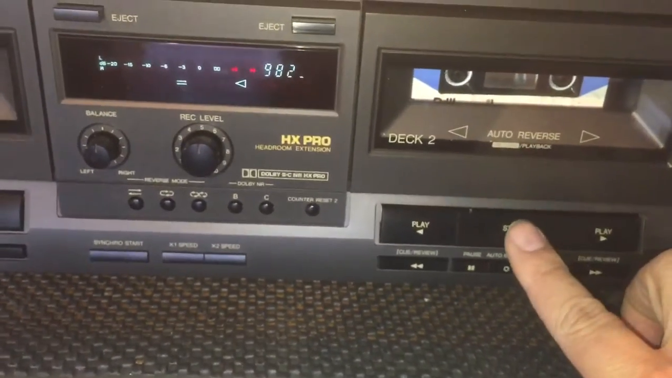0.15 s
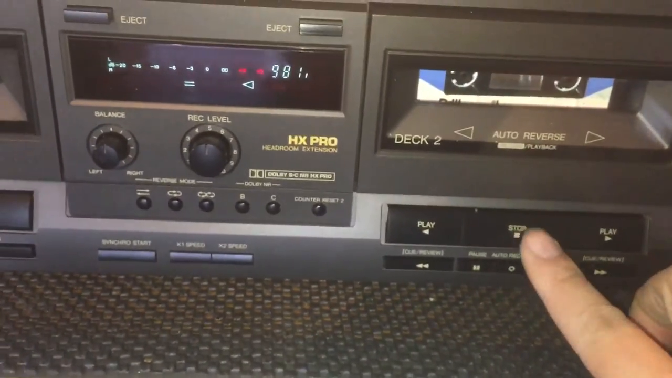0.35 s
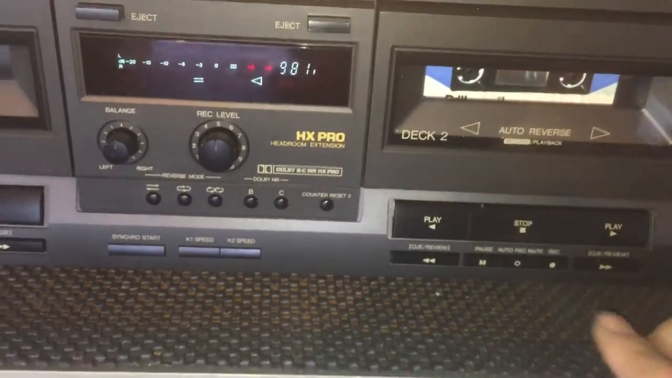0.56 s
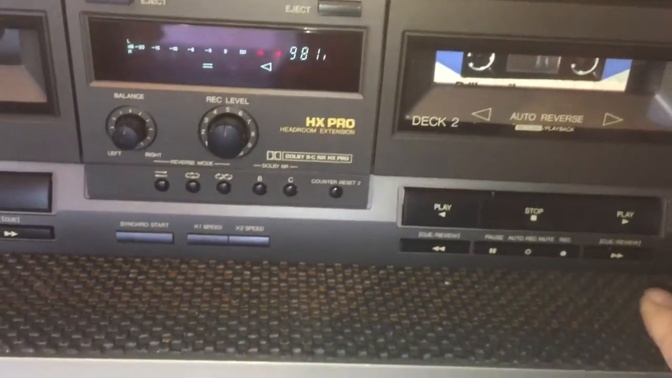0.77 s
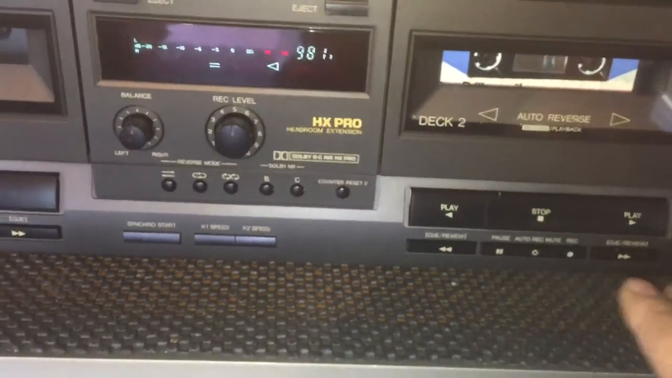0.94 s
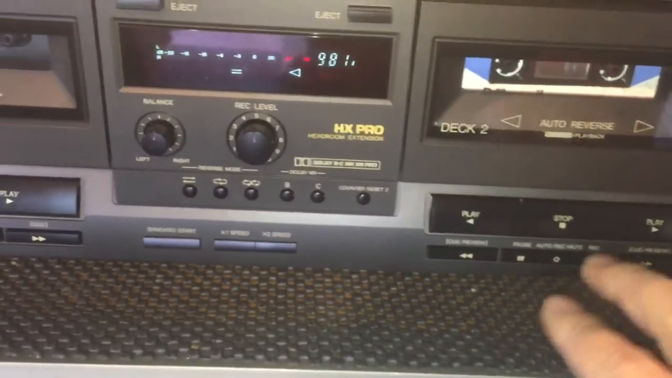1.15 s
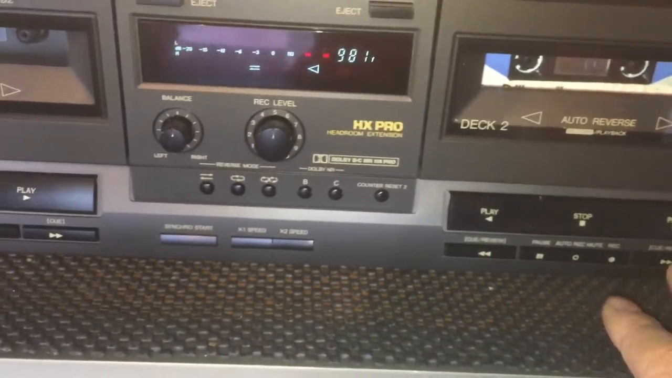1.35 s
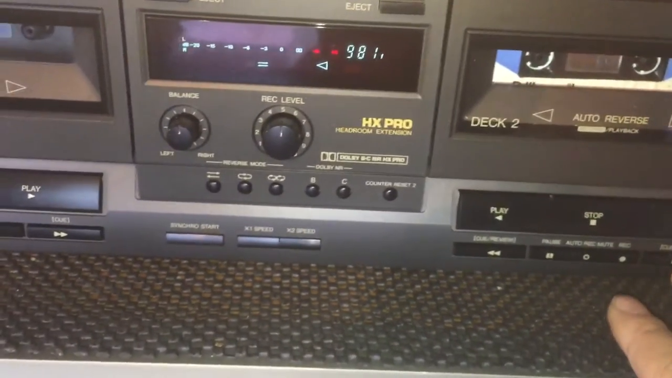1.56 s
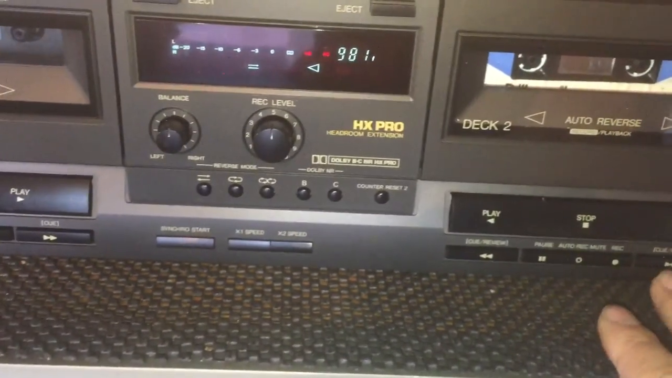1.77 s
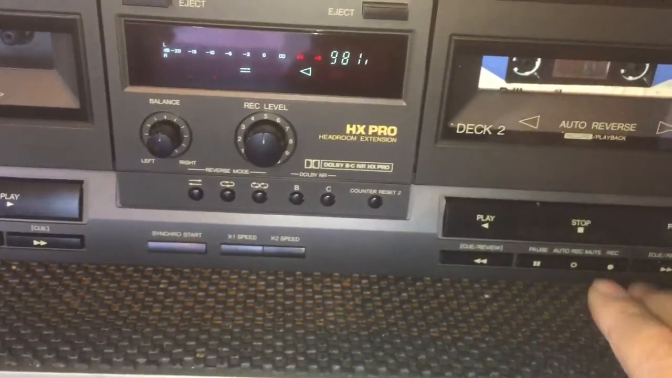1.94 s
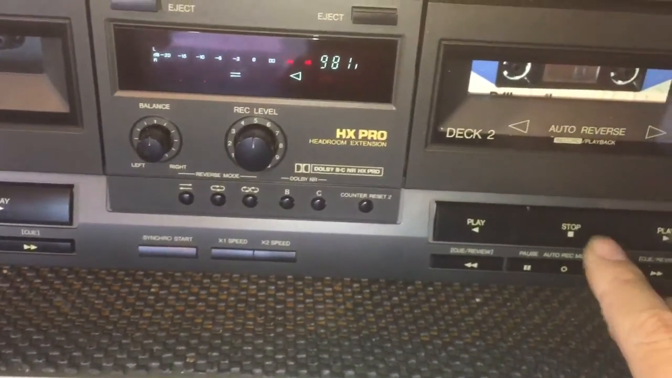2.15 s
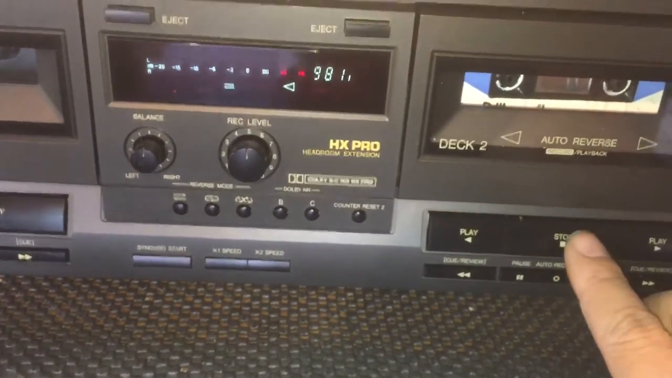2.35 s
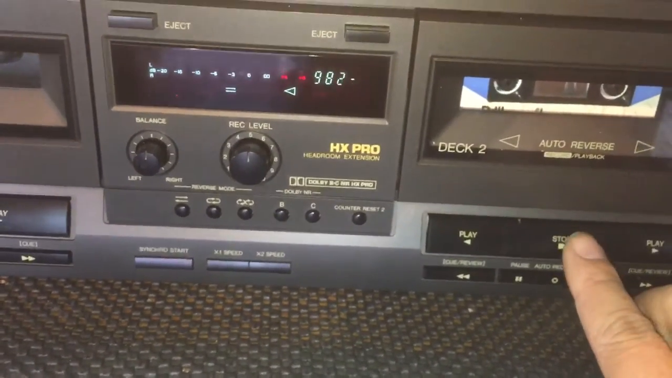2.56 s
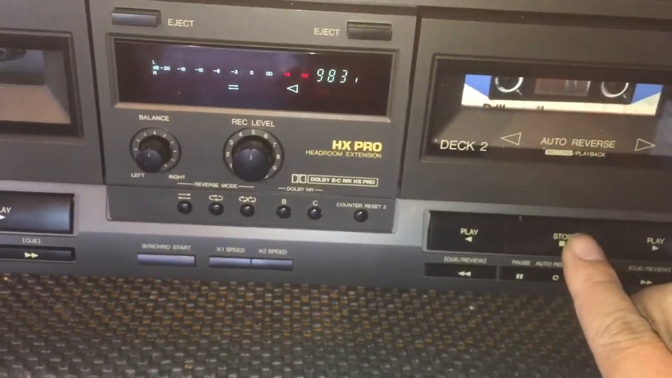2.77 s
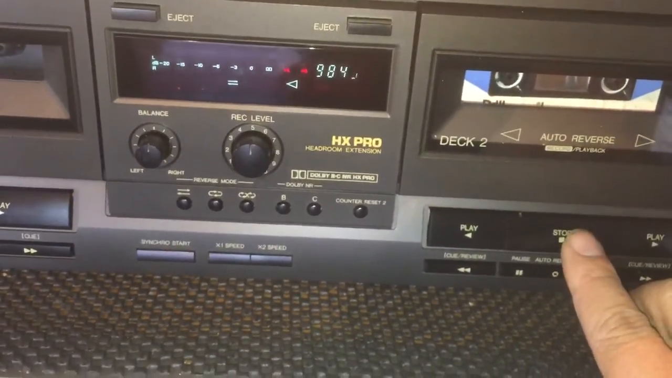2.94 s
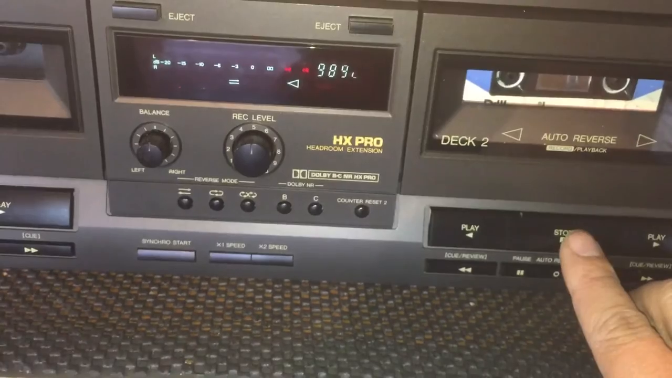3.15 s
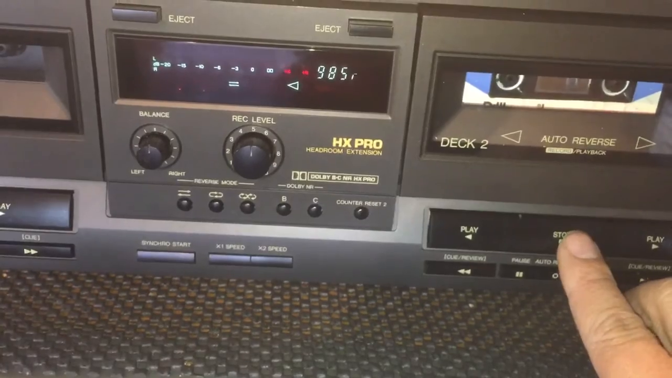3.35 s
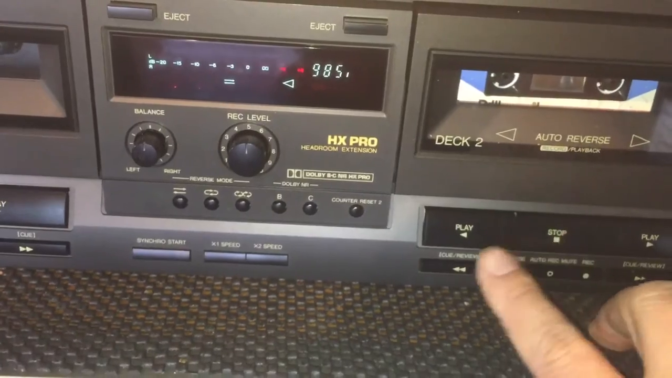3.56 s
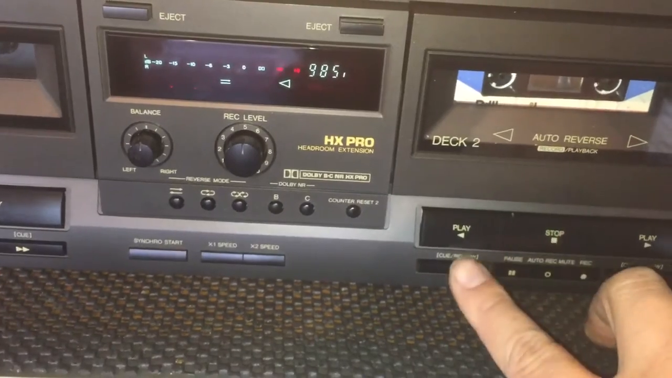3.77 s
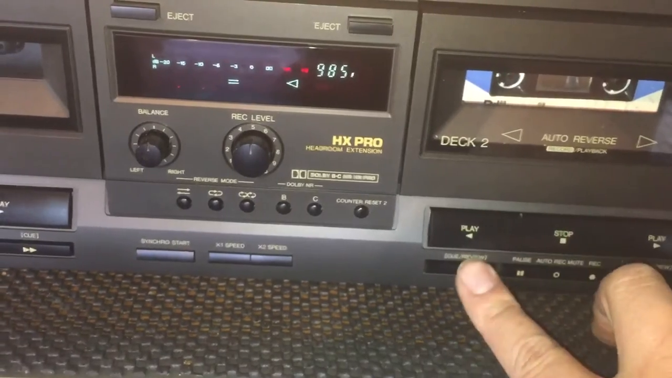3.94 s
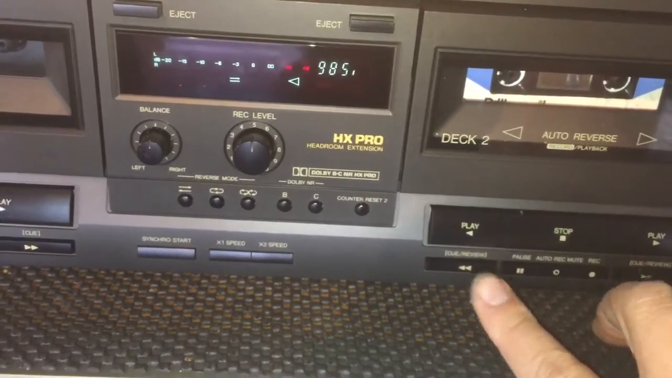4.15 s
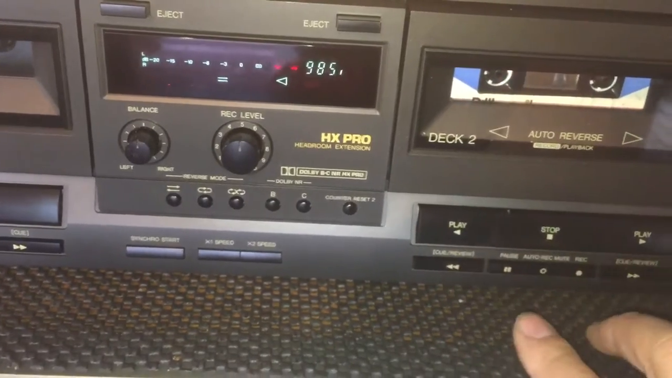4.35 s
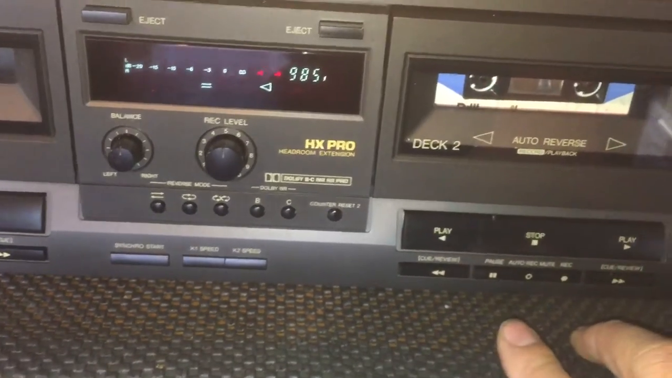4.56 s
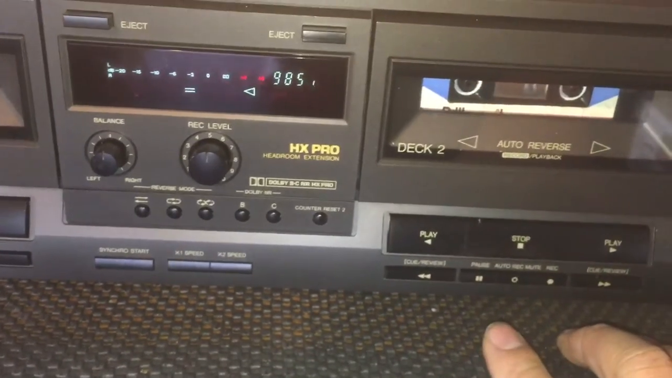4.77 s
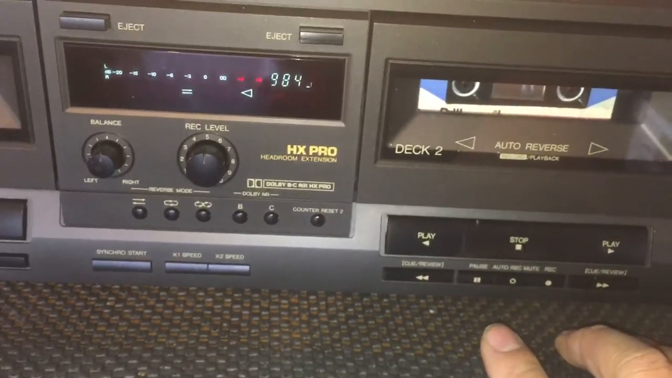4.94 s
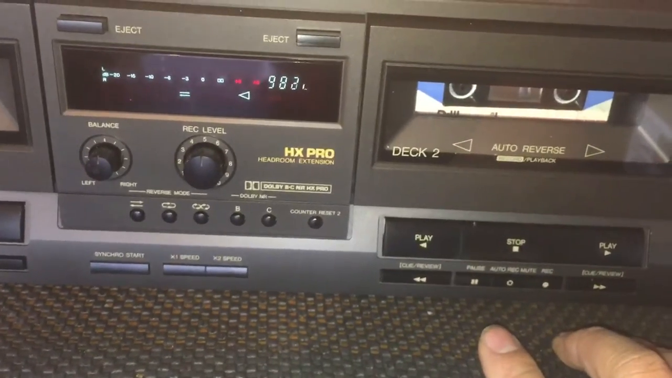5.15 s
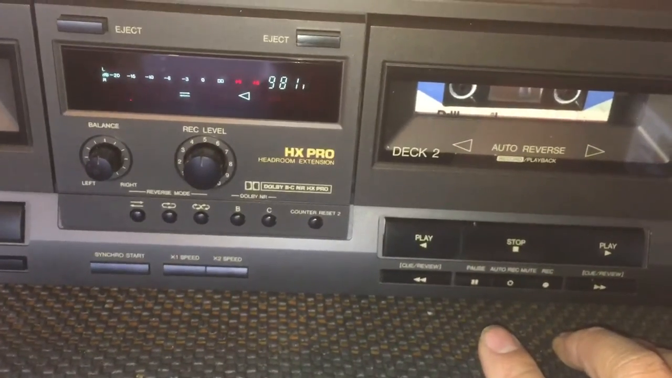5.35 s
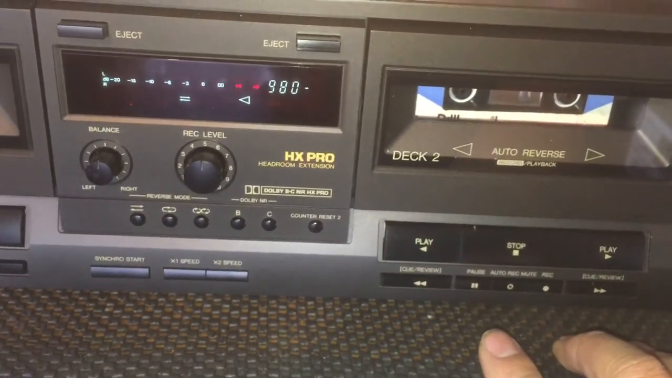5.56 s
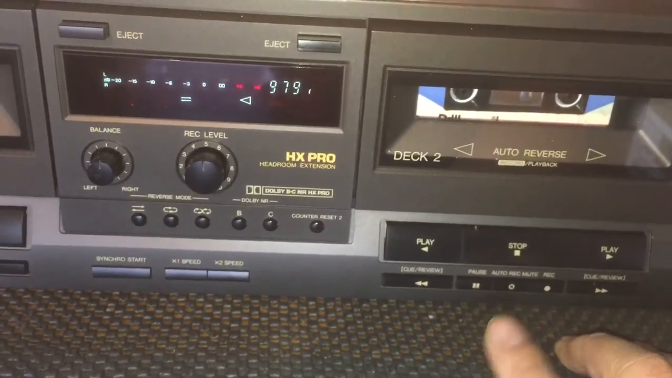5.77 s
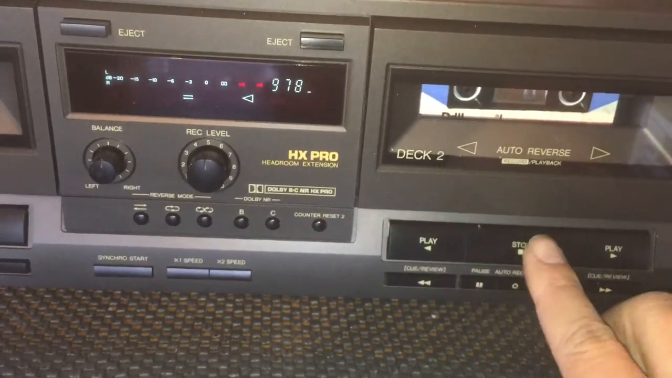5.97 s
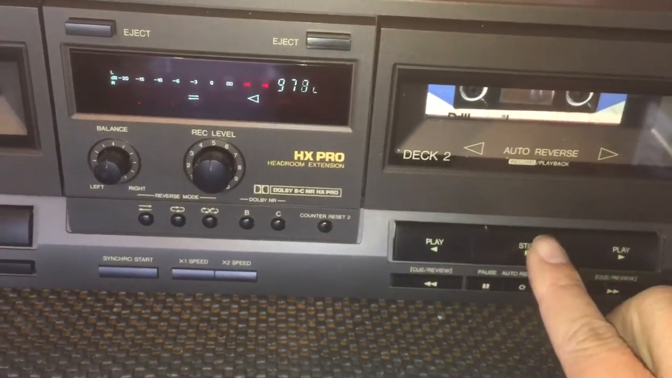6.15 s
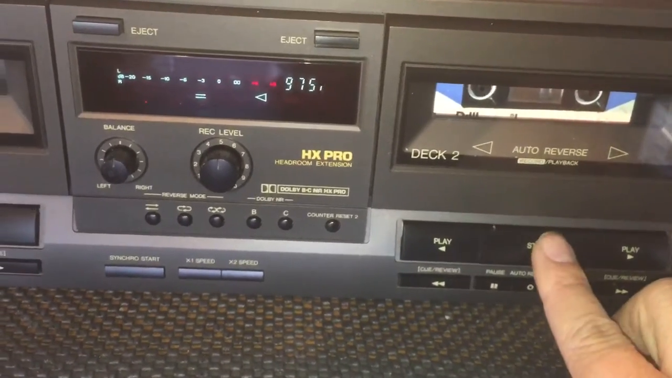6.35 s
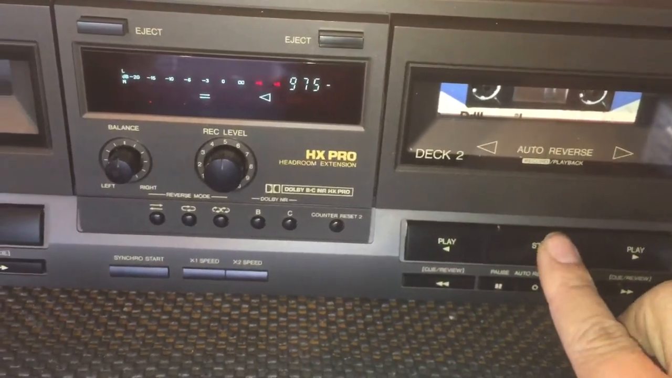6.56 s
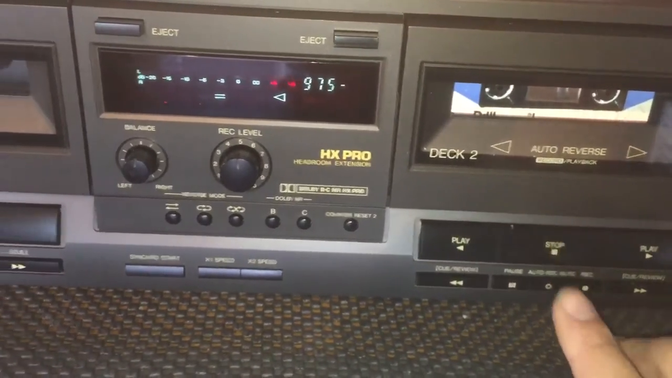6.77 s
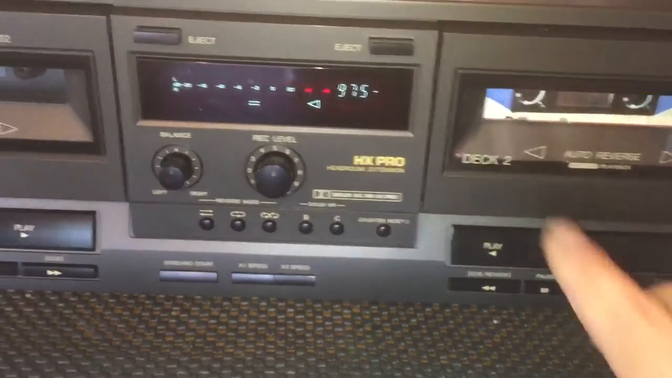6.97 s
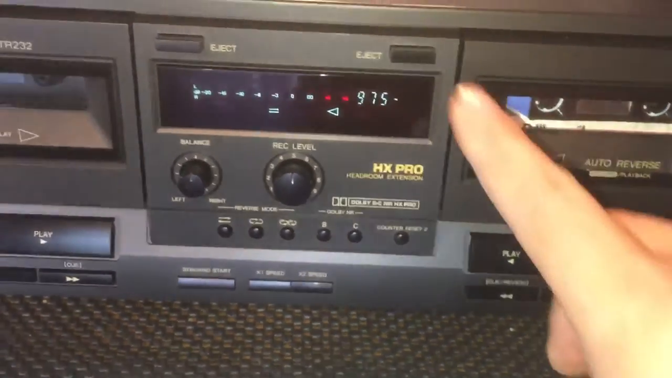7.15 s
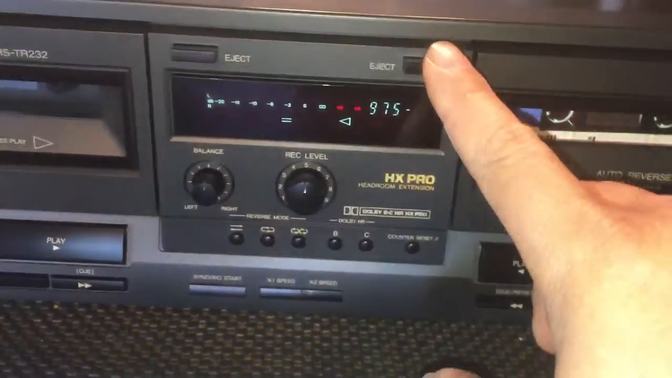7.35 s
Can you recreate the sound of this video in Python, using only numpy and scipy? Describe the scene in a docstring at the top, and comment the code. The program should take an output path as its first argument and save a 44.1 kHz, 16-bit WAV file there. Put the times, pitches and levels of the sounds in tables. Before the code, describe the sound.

Close up in a small room, a cassette deck rewinds for a moment with fast, loud ticking, then a button clicks and the tape stops with a clatter. More clicks and mechanical clacks lead into about a second of soft, whining forward winding. It stops sharply, the mechanism clacks again, and a longer ticking rewind ends in a last clatter, over faint room rumble.

```python
"""First comes a moment of fast, loud ticking over faint room rumble: a cassette deck is rewinding, close up
in a small room, and a gear tooth catches on every turn. A key clicks and the tape stops with a clatter as
the gears drop out and a steel brake snaps home. After more clicks, a cam (a shaped wheel that pushes
levers) swings the heads and gears in with clacks, and the tape winds forward with a soft gear whine.
It stops, the cam turns again, and a longer rewind ends in a last clatter."""
import sys
import numpy as np
from scipy import signal
from scipy.fft import rfft, irfft, next_fast_len
from scipy.io import wavfile
from scipy.ndimage import map_coordinates

SR = 44100
rng = np.random.default_rng(int(sys.argv[2]) if len(sys.argv) > 2 else 0)


def unload_wav(signal):
    """Save mono or channel-first audio to the path in sys.argv[1] as 16-bit WAV at rate SR, clipped to [-1, 1]."""
    wavfile.write(
        sys.argv[1],
        SR,
        np.round(np.clip(np.atleast_2d(signal).T, -1, 1) * 32767).astype(np.int16),
    )


N = 326781
TIME = np.arange(N) / SR
BRIEF = TIME[:SR // 6]  # the time span of one knock

# Tone colours. Each row: frequency in Hz, relative strength there in dB.
AIR_SPECTRUM = [(12, -61), (25, -36), (38, -18), (52, -8.5), (70, -5.5), (97, -10.5), (125, -18),
                (195, -22), (249, -21.5), (476, -27), (796, -31), (887, -26.5), (1070, -29), (1700, -30),
                (8140, -39.5), (16000, -44)]  # room rumble and hiss
TICK_SPECTRUM = [(200, -33.5), (600, -25.5), (900, -12), (1800, -11.5), (2700, -4), (3700, -5), (4850, -8),
                 (5700, -5.5), (7900, -1.5), (9300, 6.5), (10300, 1.5), (11200, 6), (13000, 2.5),
                 (14500, -6), (15800, -2.5)]  # small, sharp ticks
TAPE_SPECTRUM = [(100, -18), (300, -1), (550, -7.5), (1100, 2), (1700, 1.5), (2200, 1), (3000, 1),
                 (4800, -9), (6500, 0.5), (9500, -4.5), (13000, -9), (15800, -10.5)]  # moving tape
KEY_SPECTRUM = [(300, -39.5), (600, -12), (880, -6), (1400, -5), (2250, -3), (3000, -3.5), (3800, -5),
                (5000, -14.5), (8000, -40.5)]  # a plastic key
THUD_SPECTRUM = [(35, -26), (80, -5.5), (120, -18.5), (190, 0), (250, 0.5), (370, -4.5), (520, -8.5),
                 (700, -13.5), (1200, -45)]  # the low part of a blow
CLACK_SPECTRUM = [(300, -36), (580, -4.5), (760, -2), (1300, -4.5), (1900, -1), (3100, 1), (4300, -4.5),
                  (5200, -10), (8000, -39)]  # its middle
SNAP_SPECTRUM = [(2000, -49.5), (4200, -12.5), (4900, -9.5), (5600, 3.5), (7500, -1.5), (8800, -3),
                 (10000, -10.5), (13000, -36)]  # its lower treble
SIZZLE_SPECTRUM = [(5000, -41), (8000, -13), (9200, -2.5), (10400, -3.5), (11700, 0), (13500, -4),
                   (15800, -9)]  # its upper treble
MOTOR_SPECTRUM = [(60, -0.5), (120, 0.5), (200, -9), (340, 1.5), (500, -9.5), (900, -9), (2500, -13),
                  (6000, -22), (15000, -23)]  # the cam's grinding drive
# Pitches that a part boosts or weakens. Each row: centre in Hz, width in Hz, boost in dB (minus is a dip).
GEAR_RESONANCES = [(279.2, 15, 5.5), (504, 140, 5), (620, 75, -10), (980, 42, 5), (1163, 51, 8.5),
                   (1370, 48, 9), (1493, 72, 9.5), (1670, 40, 4), (1790, 81, -8), (2008, 60, 10.5),
                   (2530, 76, -7), (2720, 190, 4), (3110, 320, 3.5), (3556, 190, 12), (4210, 280, 8.5),
                   (5360, 110, 10), (5850, 240, 10.5), (6930, 450, 8), (8200, 400, -1.5), (8960, 340, 4.5),
                   (11800, 210, 1.5), (11250, 280, 2), (13700, 470, 5.5)]
KEY_RESONANCES = [(870, 47, 11), (1205, 110, 7.5), (1470, 46, -4.5), (1710, 160, 2), (2820, 200, 3.5),
                  (4270, 300, 4.5), (5800, 500, 3.5), (7040, 500, 4.5), (8600, 400, 2.5),
                  (10500, 400, -2.5), (13400, 600, 6)]
CHASSIS_RESONANCES = [(270.5, 21, 8.5), (343, 44, 7), (440, 70, -1.5), (628, 58, -9), (742, 91, 6.5),
                      (849.7, 70, 5.5), (1159, 170, 10), (1620, 38, 6), (1670, 48, 9), (2010, 15, 2.5),
                      (2300, 56, 4), (2780, 67, 5.5), (3111, 170, 4), (3240, 120, 3.5), (3500, 160, 2.5),
                      (4400, 210, 2.5), (5900, 170, 3), (7000, 500, 2), (9100, 500, 4.5), (11500, 600, 3.5),
                      (12400, 500, 2)]  # the deck's frame and door
# Steady tones of the room and of the rewinding drive. Each row: pitch in Hz, level in dB.
HUM_TONES = [(64.6, -77), (899, -89.5)]
DRIVE_TONES = [(270, -66), (754, -58), (1500, -72)]
# Rewinds. Each row: start, moment the cam stops dragging, and end, all in seconds.
REWIND_RUNS = [(.0132, -.1, .262), (4.7955, 4.856, 6.48)]
# How hard the tooth catches as the tape's pull changes. Each row: time in seconds, force in dB.
TOOTH_FORCE = [(.1, -23), (.26, -23), (4.85, -24.5), (5.3, -24), (5.6, -23.5), (5.9, -24), (6.4, -23)]
# Keys going down or up. Each row: start in seconds, clack level in dB, pitch of the key in Hz.
KEY_CLICKS = [(.215, -24, 2210), (0.374, -25.5, 2300), (1.6071, -31.5, 2982), (1.751, -44.5, 2915),
              (3.403, -23.5, 2254), (3.9255, -26.5, 3325), (4.158, -37, 2920), (6.4444, -21.5, 2250),
              (6.652, -26, 2420)]
# Faint handling ticks. Each row: start in seconds, level in dB.
HANDLING_TICKS = [(.70, -64), (.715, -70.5), (6.964, -63.5), (7.014, -58.5), (7.031, -54.5), (7.047, -61.5)]
# Stops. Each row: time of the brake's snap in seconds, extra force of the gears dropping out in dB.
BRAKE_STOPS = [(0.3121, 0.5), (3.501, -2), (6.5352, 1)]
# Blows inside the deck. Each row: start in seconds, relative levels of thud, clack and snap in dB,
# brightness in dB, contact time in seconds.
STOP_HITS = [(-.047, -37.5, -25.5, -22.5, 0, .004), (-.0375, -30.5, -16.5, -16.5, -2.5, 0.0039),
             (-.021, -30, -32, -31, 0.5, .004), (0, -40, -23, -11, 0, .0003),
             (0.0137, -37, -27.5, -23, 0, .003)]  # gears drop out, the brake snaps and rebounds; timed from the snap
CAM_HITS = [(0, -42, -24.5, -24, 0.5, .0046), (.038, -38.5, -38, -33, -1, 0.004),
            (.0787, -42.5, -31, -26.5, -2, 0.0015), (.1098, -44, -33.5, -21, 4.5, .0003),
            (.126, -41, -32.5, -34, -8, .0017), (.188, -55, -45.5, -47, 2.5, 0.0054),
            (.266, -50.5, -44.5, -38, 1, .0018), (0.2814, -45.5, -41.5, -26.5, 5, .0004),
            (.3648, -41.5, -23.5, -24, 0.5, 0.0053), (.4663, -38.5, -26.5, -34, -4.5, .0015),
            (.477, -40, -45.5, -31.5, 0, .002), (.4865, -31, -24, -21, 2, .0042)]  # the levers that every cam turn trips; timed from the first blow
SHIFT_HITS = [(1.778, -47, -42, -61.5, 2, .004), (2.264, -39.5, -36, -33.5, -4.5, 0.0024),
              (2.368, -34.5, -29, -22.5, -0.5, 0.0016), (2.439, -60, -48, -28, 2.5, 0.0035),
              (2.448, -46, -32.5, -25, 3, 0.0043), (2.467, -66, -31.5, -27, 5, 0.0022),
              (2.495, -52.5, -44, -36.5, 3.5, .001), (2.565, -32.5, -25.5, -28, -1.5, 0.0027),
              (4.59, -48, -42.5, -37.5, -3, 0.00104), (4.758, -41, -33.5, -32.5, -4, 0.0037),
              (4.78, -37.5, -29.5, -25, 0, .002), (4.8905, -31.5, -21, -24, -6, 0.0019)]  # the drive takes up a direction; timed from the scene's start
# Ringing of the cover and the steel brake. Each row: pitch in Hz, level in dB, seconds to fade by 60 dB.
COVER_MODES = [(161.05, -9.5, 0.7), (258.2, -5.5, 0.28), (340, -12.5, 0.6), (386.5, -7.5, 0.45),
               (695, -11.5, 0.16), (887, -10.5, 0.45), (1300, -11, 0.21), (1546, -11, .25),
               (1587, -8, 0.34)]
BRAKE_MODES = [(5630, -3, .05), (5770, -4, .045), (5950, -6, .055), (6940, -9, .04), (9160, -1, 0.064),
               (9800, -4.5, .04), (11300, 0, .045)]
# Turns of the cam. Each row: start of its motor in seconds, first blow in seconds.
CAM_STARTS = [(1.75, 1.855), (4.16, 4.1699)]
# Forward gear whine. Each row: multiple of the rate at which teeth meet, relative level in dB.
WHINE_HARMONICS = [(1, -14), (2, -5), (3, 0), (4, -1), (5, -18), (6, -12), (7, -17)]
# The room's echo. Each row: frequency in Hz, seconds to fade by 60 dB.
ROOM_DECAY = [(150, 0.28), (500, 0.36), (2000, 0.16), (5000, 0.13), (12000, 0.051)]


def amp(db):
    """Turn decibels into a factor to multiply by."""
    return 10 ** (np.asarray(db) / 20)


def along(points, hz):
    """Read between the rows of a (Hz, value) table, spacing octaves evenly."""
    freqs, values = np.transpose(points)
    return np.interp(np.log(hz + 1), np.log(freqs), values)


def wobble(rate):
    """A smooth random curve through `rate` new values a second."""
    return map_coordinates(rng.standard_normal(int(N * rate / SR) + 4), [TIME * rate])


def running(start, end, ramp=0.018):
    """One while a motor runs, zero otherwise, with short fades."""
    return np.clip((TIME - start) / ramp, 0, 1) * np.clip((end - TIME) / ramp + 1, 0, 1)


def add(track, start, sound):
    """Mix a sound into a track at `start` seconds."""
    i = max(round(start * SR), 0)
    track[i:i + len(sound)] += sound[:N - i]


def colour(sound, spectrum, resonances=(), size=8192):
    """Give a sound a tone colour and resonances; white noise keeps its level."""
    hz = np.fft.rfftfreq(size, 1 / SR)
    peaks_db = sum(boost / (1 + (2 * (hz - centre) / width) ** 2) for centre, width, boost in resonances)
    cepstrum = irfft(np.log(amp(along(spectrum, hz) + peaks_db)))
    # folding onto the first half makes the filter ring after a hit, never before it
    cepstrum[1:size // 2] *= 2
    cepstrum[size // 2 + 1:] = 0
    response = irfft(np.exp(rfft(cepstrum)))
    return signal.fftconvolve(sound, response / np.linalg.norm(response))[:N]


def burst(contact, t60, tail_db=-18, tail_t60=.09, crack=0):
    """A knock: noise builds during contact, then falls 60 dB in t60 seconds, leaving a weaker rattle."""
    after = np.maximum(BRIEF - contact, 0)
    rise = np.sqrt(np.minimum(BRIEF / contact, 1))
    fall = np.hypot(amp(-60 * after / t60), amp(tail_db - 60 * after / tail_t60))
    return rise * fall * rng.standard_normal(len(BRIEF)) + crack * (BRIEF == 0)


def ring(modes, scatter_db=2):
    """A struck part rings with fading tones, at new strengths each time."""
    t = TIME[:SR]
    return sum(amp(db + scatter_db * rng.standard_normal() - 60 * t / t60)
               * rng.choice((-1, 1)) * np.sin(2 * np.pi * hz * t) for hz, db, t60 in modes)


def tones(lines, waver_hz):
    """Steady tones that wander a little in pitch."""
    return sum(amp(db) * np.sqrt(2) * np.sin(2 * np.pi * np.cumsum(hz + waver_hz * wobble(25)) / SR)
               for hz, db in lines)


def background():
    """Low room rumble, hiss and a faint hum."""
    air = amp(-64.5 + .87 * wobble(4.1)) * colour(rng.standard_normal(N), AIR_SPECTRUM)
    return air + tones(HUM_TONES, waver_hz=2.2)


def rewind(start, cam_lets_go, end):
    """One tooth of the drive gear catches on every turn, over whirring gears and rushing tape."""
    turns_per_s = 45.1 - 6.6 * running(start - 1, cam_lets_go)  # slower while the cam drags
    turns = np.cumsum(turns_per_s * (TIME >= start) * (TIME <= end)) / SR
    ticks = np.zeros(N)
    catch = lambda: burst(.00059, t60=.019, tail_db=-28.5, tail_t60=.18)
    same_tooth, slack = catch(), wobble(2.4)
    for i in np.searchsorted(turns, np.arange(turns[-1]), side="right"):
        at = TIME[i]
        force = amp(np.interp(at, *np.transpose(TOOTH_FORCE)) + rng.standard_normal())
        add(ticks, at, force * (.56 * same_tooth + .9 * catch()))
        # the tooth rebounds at once; the loose gear rattles later in the turn, louder in spells
        add(ticks, at + rng.uniform(.001, .002), force * amp(-4) * catch())
        add(ticks, at + rng.uniform(.007, .018), force * amp(rng.normal(-18, 3) + 3 * slack[i]) * catch())
    rush = amp(-47 + wobble(12)) * rng.standard_normal(N)
    whirr = colour(rush, TAPE_SPECTRUM, GEAR_RESONANCES) + tones(DRIVE_TONES, waver_hz=2.9)
    return colour(ticks, TICK_SPECTRUM, GEAR_RESONANCES) + running(start - .04, end + .02) * whirr


def keys():
    """A finger thuds, a springy switch dome flips and knocks its key; handling adds faint ticks."""
    clicks, ticks = np.zeros((2, N))
    for start, clack_db, key_hz in KEY_CLICKS:
        clack = amp(clack_db) * burst(.0028, t60=.035, tail_db=-17.5, tail_t60=.11)
        snap = amp(clack_db - 6.5) * burst(.0004, t60=.031)
        thud = amp(-49) * burst(.0022, t60=.072)
        add(clicks, start, colour(thud, THUD_SPECTRUM, CHASSIS_RESONANCES))
        add(clicks, start, colour(clack, KEY_SPECTRUM, list(KEY_RESONANCES) + [(key_hz, 900, 7)]))
        for spectrum in (SNAP_SPECTRUM, SIZZLE_SPECTRUM):
            add(clicks, start, colour(snap, spectrum, KEY_RESONANCES))
    for start, db in HANDLING_TICKS:
        add(ticks, start, amp(db) * burst(.002015, t60=.028))
    return clicks + colour(ticks, TICK_SPECTRUM)


def blows():
    """List every blow inside the deck: drive shifts, cam turns and stops."""
    rows = list(SHIFT_HITS)
    for _, start in CAM_STARTS:
        rows += [(start + after, *blow) for after, *blow in CAM_HITS]
    for snap_s, drop_db in BRAKE_STOPS:
        for after, *levels_db, bright_db, contact in STOP_HITS:
            extra_db = drop_db if after < 0 else 0
            rows.append((snap_s + after, *(db + extra_db for db in levels_db), bright_db, contact))
    return rows


def levers_and_brake():
    """Parts hit the frame with a thud, a plastic clack and a snap; the cover and steel brake ring."""
    thud, clack, snap, sizzle, ringing = np.zeros((5, N))
    for start, thud_db, clack_db, snap_db, bright_db, contact in blows():
        hardness = np.exp(-contact / .0022)  # shorter contacts are harder
        shake = amp(.22 * (snap_db + 24.5))  # strong blows shake loose parts, so they last longer
        add(thud, start, amp(thud_db - 2) * burst(contact + .002, t60=.096, tail_db=-13.5, tail_t60=.13))
        add(clack, start, amp(clack_db + .44) * burst(contact, t60=.045, tail_db=-6, tail_t60=.089))
        # brightness shares the snap's energy between lower and upper treble
        for track, tilt_db in ((snap, -bright_db), (sizzle, bright_db)):
            share = 1 / np.hypot(1, amp(-tilt_db))
            chatter = burst(contact, t60=shake * (.019 + 5 * contact), tail_db=-14 - 10 * hardness,
                            tail_t60=.105 * shake, crack=3.5 * hardness)
            add(track, start, share * amp(snap_db + .5 + 2 * hardness) * chatter)
        add(ringing, start, amp(thud_db - 12.5) * shake ** 3 * ring(COVER_MODES))
        add(ringing, start, amp(snap_db - 17.5) * shake * hardness * ring(BRAKE_MODES))
    layers = ((thud, THUD_SPECTRUM), (clack, CLACK_SPECTRUM),
              (snap, SNAP_SPECTRUM), (sizzle, SIZZLE_SPECTRUM))
    return ringing + sum(colour(track, spectrum, CHASSIS_RESONANCES) for track, spectrum in layers)


def cam():
    """The cam gear grinds lightly, rests, then grinds harder as it lifts the tape heads."""
    light_db, lift_db = -56.5, -51
    effort = np.zeros(N)
    for motor_start, first_blow in CAM_STARTS:
        effort += amp(light_db) * running(motor_start, first_blow + .28)
        effort += amp(lift_db) * running(first_blow + .35, first_blow + .8)
    grind = effort * amp(1.8 * wobble(60)) * rng.standard_normal(N)
    return colour(grind, MOTOR_SPECTRUM, CHASSIS_RESONANCES)


def wind_forward():
    """Gear teeth whine; the tape rubs once a turn of the idler, a small wheel that ticks unevenly."""
    start, end, idler_seats = 2.44, 3.465, 2.567  # seconds
    spin_up_s, hiss_rise_s, settling_s = .17, .24, .09
    whine_db, hiss_db, settling_db = -54.5, -55.5, -34
    age = np.maximum(TIME - start, 0)
    tooth_hz = 385.5 - 30.2 * np.exp(-age / spin_up_s)  # the motor closes in on full speed
    teeth = np.cumsum(tooth_hz * (1 + .007 * wobble(60))) / SR
    whine = sum(amp(db + 3.2 * wobble(45)) * np.sin(2 * np.pi * k * teeth) for k, db in WHINE_HARMONICS)
    whine *= amp(whine_db) / np.sqrt(np.mean(whine ** 2))
    idler_turns = (teeth - np.interp(idler_seats, TIME, teeth)) / 13.4
    rub_db = hiss_db + 1.2 * np.sin(2 * np.pi * idler_turns) + wobble(5.4) + .99 * wobble(150)
    rub = np.minimum(age / hiss_rise_s, 1) * amp(rub_db) * rng.standard_normal(N)
    ticks = np.zeros(N)
    for i in np.flatnonzero(np.diff(np.floor(idler_turns))):
        settling = 0 <= TIME[i] - idler_seats < settling_s  # the idler ticks harder as it settles in
        db = rng.normal(settling_db, 1) if settling else rng.normal(hiss_db + 8, 3.8)
        add(ticks, TIME[i] + rng.normal(0, .00086), amp(db) * burst(.00046, t60=.02))
    hiss = colour(rub, TAPE_SPECTRUM, CHASSIS_RESONANCES)
    return running(start, end) * (whine + hiss + colour(ticks, TICK_SPECTRUM, GEAR_RESONANCES))


def room(sound):
    """The small room's echo: each frequency dies away at its own speed."""
    hz, t, noise = signal.stft(rng.standard_normal(SR // 2), SR, nperseg=256)
    fade = amp(-60 * t / along(ROOM_DECAY, hz)[:, None])
    tail = signal.istft(noise * fade, SR, nperseg=256)[1]
    tail *= np.minimum(TIME[:len(tail)] / .0074, 1)
    return signal.fftconvolve(sound, tail / np.linalg.norm(tail))[:N]


def scene():
    """The deck close up, with a little of the room, in one channel."""
    deck = levers_and_brake() + keys() + sum(rewind(*run) for run in REWIND_RUNS) + wind_forward() + cam()
    return (deck + amp(-14) * room(deck) + background())[None]


def record(dry):
    """Round off the tallest peaks, then take away the deepest bass and the highest treble."""
    bass_hz, top_hz = 36, 16000
    size = next_fast_len(N + SR // 2)
    hz = np.fft.rfftfreq(size, 1 / SR)
    response = hz ** 3 / np.hypot(hz ** 3, bass_hz ** 3) * (hz < top_hz)
    rounded = dry / (1 + dry ** 8) ** (1 / 8)
    return irfft(rfft(rounded, size) * response, size)[:, :N]


dry = scene()
out = record(dry)
unload_wav(out)
```